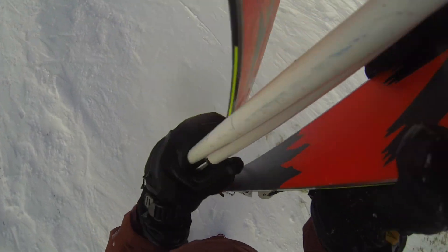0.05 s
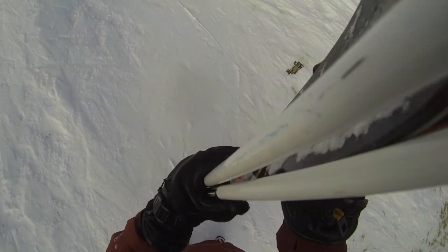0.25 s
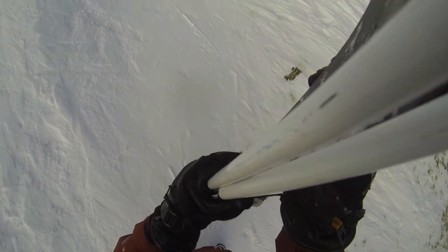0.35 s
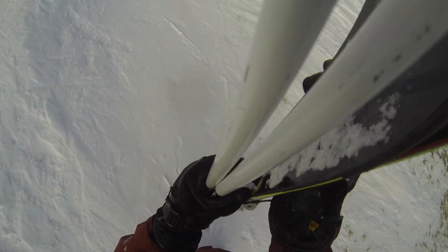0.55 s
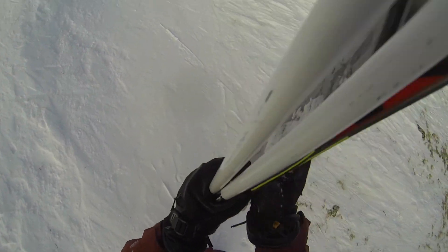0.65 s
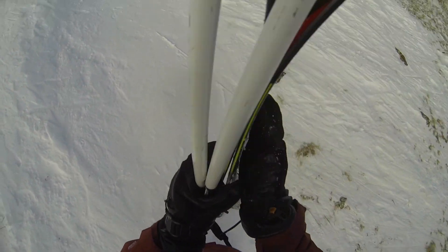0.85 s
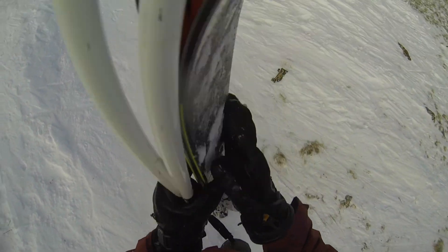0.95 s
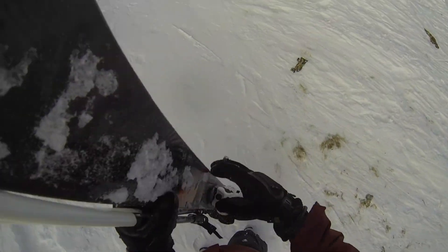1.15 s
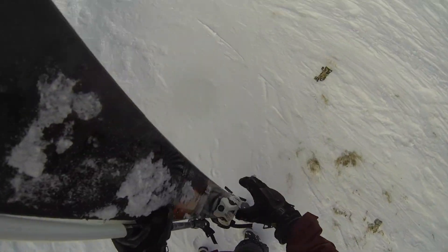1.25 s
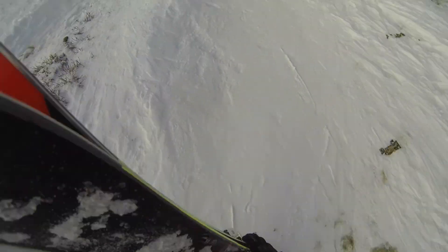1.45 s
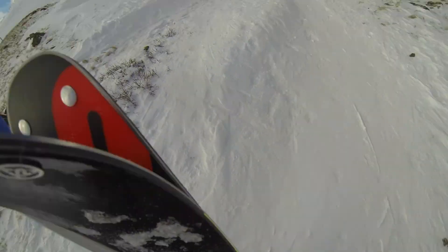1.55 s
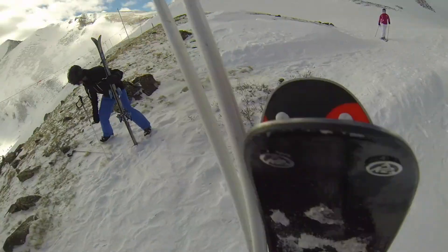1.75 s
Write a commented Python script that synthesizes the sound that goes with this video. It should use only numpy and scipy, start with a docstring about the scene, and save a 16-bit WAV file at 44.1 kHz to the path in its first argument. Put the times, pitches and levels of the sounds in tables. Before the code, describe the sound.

Skis hit right against the microphone with a loud hollow clack and a brief scraping rattle. Poles then tap thinly and gloves rub faintly, while wind rumbles and thumps on the microphone outdoors on a snowy slope.

```python
"""Gathering up skis and poles

On a snowy slope, skis knock against the camera's case, bend and chatter along their edges.
Poles tap, gloves and snow rub, and wind buffets and thumps the microphone.
The first knock overloads the recorder, which turns its volume down and then lets it creep back."""
import sys
import numpy as np
from scipy import signal
from scipy.fft import rfft, irfft
from scipy.io import wavfile
from scipy.ndimage import uniform_filter1d

SR = 44100
rng = np.random.default_rng(int(sys.argv[2]) if len(sys.argv) > 2 else 0)


def unload_wav(signal):
    """Save mono or channel-first audio to the path in sys.argv[1] as 16-bit WAV at rate SR, clipped to [-1, 1]."""
    wavfile.write(
        sys.argv[1],
        SR,
        np.round(np.clip(np.atleast_2d(signal).T, -1, 1) * 32767).astype(np.int16),
    )


N = 79380
TIME = np.arange(N) / SR

# A struck object rings with a few tones, its "modes". Ring time is how long one takes to fade by 60 dB.
# tones of a ski: (pitch [Hz], level [dB], ring time [s])
SKI_MODES = [(253, -24.5, 0.035), (430, -33, 0.013), (473.1, -22, 0.021), (638, -29.5, 0.067),
             (892, -33, 0.044), (1040, -27.5, 0.035), (1445, -30, 0.11), (1615, -36, .11),
             (1930, -26.5, 0.063), (2164, -26, 0.026), (2400, -33.5, 0.048), (2950, -39, .06),
             (3385, -47, 0.11)]
# tones of a pole, heard through the case: (pitch [Hz], level [dB], ring time [s])
POLE_MODES = [(1330, -1, 0.026), (1540, -1.5, 0.022), (2190, -11.5, 0.013), (2658.6, -13.5, .025),
              (3080, -14.5, 0.024), (3500, -13, 0.016), (4100, -18.5, .025), (4820, -11, .03),
              (5070, -15, 0.012), (6040, -14, 0.021), (6700, -20.5, 0.018), (7750, -20.5, .02)]


def ski_knocks():
    """Skis hit the case with a hollow clack, a thud and a crack, then ring and bend."""
    # knocks and bounces: (time [s], level [dB], brightness [Hz], crack [dB], thud [dB], clack pitch [Hz])
    knocks = [(0.2144, 22.5, 4245, -12.5, -7, 1442), (0.2249, 2.5, 2967, -14, -21.5, 1507),
              (0.234, -6, 2800, -24, -16.5, 1500), (0.2401, -0.5, 2400, -11, -20.5, 1550),
              (0.2576, -7, 2500, -5, -20, 1500), (.2602, 10.5, 3500, -19, -25, 1540),
              (0.27, -0.5, 1500, -13.5, -23, 1500), (.3370, 1.5, 2930, -14.5, -11, 1553),
              (0.3405, 2.5, 1720, -27, -17.5, 1454)]
    # heavy shoves that bend the skis: (time [s], level [dB])
    shoves = [(0.2155, -1), (0.235, -10), (0.26, -9), (0.339, -4), (.3750, -11.5), (0.392, -14.5)]
    # low tones of a whole ski bending: (pitch [Hz], level [dB], ring time [s])
    bending_modes = [(50, -4.5, 0.15), (101.5, -3.5, 0.058), (157, -17.5, .11)]
    # brief presses against the case: (time [s], level [dB], clack pitch [Hz])
    nudges = [(0.24, -7.5, 1540), (.3080, -17, 1587), (.3120, -17.5, 1500), (0.3724, -14.5, 1458),
              (0.3766, -5.5, 1468), (0.386, -13, 1420)]
    # the blow itself, gone at once: (pitch [Hz], level [dB], ring time [s])
    thud_modes = [(350, -0.5, .012), (966, 2.5, .012)]
    # tone colour of the crack: (frequency [Hz], level [dB])
    crack_colour = [(150, -1.5), (700, 10.5), (1500, 3.5), (3500, -5.5), (6000, -33), (10000, -28.5),
                    (15000, -24.5)]
    out = ring(sum(click(s, db) for s, db in shoves), bending_modes)
    out += sum(clack(click(s, db), hz) for s, db, hz in nudges)
    for s, db, bright_hz, crack_db, thud_db, pitch_hz in knocks:
        force = soften(click(s, db), bright_hz)
        out += clack(force, pitch_hz) + from_db(thud_db) * ring(force, thud_modes)
        out += strike([(s, db, bright_hz)], case_overtones() + SKI_MODES)
        out += cracks([(s, db + crack_db, bright_hz)], crack_colour, ring_s=0.02)
    return out


def clack(force, hz, ring_s=0.0076):
    """The case's main tone, applied twice so that it swells for a few cycles and dies."""
    decay, angle = np.exp(-np.log(1000) / (ring_s * SR)), 2 * np.pi * hz / SR
    once = ring(force, [(hz, 10.5, ring_s)])
    gain = (1 - decay ** 2) / 2
    return signal.lfilter([gain, 0, -gain], [1, -2 * decay * np.cos(angle), decay ** 2], once)


def case_overtones(ring_s=0.007):
    """List the case's higher tones, which die almost at once."""
    # tones above the clack: (pitch [Hz], level [dB])
    overtones = [(2450, -12), (2880, -6.5), (3400, -12), (4400, -16), (5000, -25.5), (6000, -31),
                 (7200, -30.5)]
    return [(hz, db, ring_s) for hz, db in overtones]


def edge_chatter():
    """Sliding edges make many tiny slips that keep the case and skis ringing between knocks."""
    # strength of the chatter: (time [s], level [dB])
    chatter = [(.214, -61), (.219, -27), (.244, -38.5), (.252, -50), (.268, -5.5), (.288, -31), (.303, -25),
               (.313, -25.5), (.320, -38.5), (.335, -37), (.341, -12.5), (.360, -25), (.378, -21.5),
               (.394, -23.5), (.406, -58.5), (.46, -81)]
    # tone colour of the gritty scrape: (frequency [Hz], level [dB])
    grit_colour = [(120, 2), (650, 6), (900, -3.5), (1500, 13.5), (2800, -1), (4300, -22), (6000, -34),
                   (12000, -50.5)]
    slips = grains(per_s=1700, spread_db=2)
    force = soften(slips, hz=1380)
    case = rms_one(clack(force, hz=1500) + ring(force, case_overtones()))
    skis = from_db(-11) * rms_one(ring(slips, SKI_MODES))
    grit = from_db(-11.5) * coloured(slips, grit_colour)
    return level(chatter) * (case + skis + grit)


def pole_taps(bass_cut_hz=1310):
    """Poles tap with no weight behind them, so they sound thin and bright."""
    # light taps: (time [s], level [dB], brightness [Hz])
    taps = [(.527, -44.5, 6000), (.656, -42, 6000), (.668, -19, 13940), (.710, -27, 5500),
            (.724, -39, 7280), (.748, -40, 5500), (.775, -40, 4000), (.821, -32.5, 2320),
            (1.0205, -31, 1833), (1.603, -38.5, 1500)]
    # tone colour of a tap's crack: (frequency [Hz], level [dB])
    crack_colour = [(200, -28.5), (900, -17), (1500, -4.5), (5000, -5), (8000, -26.5), (14000, -28.5)]
    bass_cut = signal.butter(4, bass_cut_hz, "high", fs=SR, output="sos")
    ringing = signal.sosfilt(bass_cut, strike(taps, POLE_MODES))
    return ringing + from_db(-12.5) * cracks(taps, crack_colour, ring_s=0.033)


def rubbing():
    """Gloves and snow slide over the gear in fine grains, making the poles ring faintly."""
    # strength of the rubbing: (time [s], level [dB])
    rub = [(0, -69.5), (.07, -66), (.095, -59), (.13, -67), (.18, -63.5), (.22, -75), (.69, -70.5),
           (.715, -53), (.75, -54), (.80, -68), (.95, -82), (1.07, -66), (1.12, -69.5), (1.17, -61.5),
           (1.22, -79.5), (1.57, -83.5), (1.68, -64.5), (1.735, -52.5), (1.765, -53), (1.8, -80)]
    # its tone colour: (frequency [Hz], level [dB])
    rub_colour = [(800, -20), (1500, 6.5), (2200, -3), (2700, -2.5), (3150, 4), (3600, -3.5), (4050, -0.5),
                  (4600, -6.5), (5200, -4), (7000, -17), (14000, -28.5)]
    grit = grains(per_s=1100, spread_db=3.5)
    ringing = np.diff(ring(grit, POLE_MODES), prepend=0)  # favours the high tones
    poles = from_db(-8) * rms_one(soften(ringing, hz=6000))
    return level(rub) * rms_one(coloured(grit, rub_colour) + poles)


def wind_thumps():
    """Sudden puffs of wind hit the microphone and give a low thump."""
    # puffs of wind: (time [s], level [dB])
    puffs = [(0.791, -38.5), (1.157, -38.5), (1.485, -27), (1.645, -30.5)]
    # tones of the thump: (pitch [Hz], level [dB], ring time [s])
    thump_modes = [(64.9, -6, 0.22), (115.3, 2, 0.088), (163, 0, 0.075), (304, -32, 0.07),
                   (630, -19, 0.012)]
    return ring(sum(click(s, db) for s, db in puffs), thump_modes)


def wind():
    """Wind rumbles and buffets on the microphone and rushes round the case."""
    # strength of the deep gusts, low buffeting and airy rush: (time [s], level [dB])
    gusts = [(0, -38.5), (.2, -39), (.42, -30.5), (.55, -45.5), (.67, -39.5), (.76, -35.5), (.83, -36.5),
             (.92, -40), (1.05, -38.5), (1.2, -36.5), (1.28, -28.5), (1.39, -37.5), (1.49, -33.5),
             (1.57, -36.5), (1.8, -37)]
    buffet = [(0, -61), (.6, -63), (1.0, -61.5), (1.25, -57.5), (1.45, -56), (1.5, -47), (1.56, -57),
              (1.66, -46), (1.8, -49.5)]
    rush = [(0, -62), (.2, -58), (.5, -58.5), (.8, -55.5), (.95, -57.5), (1.12, -58.5), (1.3, -54),
            (1.55, -56), (1.64, -52.5), (1.8, -51.5)]
    # tone colour of each: (frequency [Hz], level [dB])
    gust_colour = [(15, -1.5), (30, -6.5), (48, 5.5), (70, -12.5), (130, -11.5), (200, -27.5), (400, -48.5),
                   (1000, -76)]
    buffet_colour = [(50, -17), (100, 12.5), (170, 2.5), (310, 8), (500, -11.5), (1000, -45.5)]
    rush_colour = [(100, -3), (300, -4.5), (500, -8), (800, -14.5), (1100, -7.5), (1350, 1.5), (1560, 5.5),
                   (1900, -11), (2800, -16.5), (4000, -22.5), (8000, -38), (15000, -48)]
    on_microphone = level(gusts) * noise(gust_colour) + level(buffet) * noise(buffet_colour)
    return on_microphone + level(rush) * noise(rush_colour)


def faint_hiss():
    """A steady hiss lies under everything."""
    # tone colour of the hiss: (frequency [Hz], level [dB])
    hiss_colour = [(500, 3.5), (5000, -0.5), (9500, 0), (12000, -8), (15000, -14.5)]
    return from_db(-78) * noise(hiss_colour)


def from_db(db):
    """Turn decibels into a multiplier."""
    return 10 ** (np.asarray(db) / 20)


def rms_one(x):
    """Scale a sound so its average strength (rms) is 1."""
    return x / np.sqrt(np.mean(x ** 2) + 1e-20)


def level(points):
    """Join (time [s], level [dB]) points into a volume curve."""
    return from_db(np.interp(TIME, *np.transpose(points)))


def coloured(x, colour):
    """Give a sound a tone colour, at strength 1."""
    hz, db = np.transpose(colour)
    bin_hz = np.maximum(np.arange(N // 2 + 1) * SR / N, 1)
    gains = from_db(np.interp(np.log(bin_hz), np.log(hz), db))
    return rms_one(irfft(rfft(x) * gains, N))


def noise(colour):
    """Steady noise with a tone colour."""
    return coloured(rng.standard_normal(N), colour)


def grains(per_s, spread_db):
    """Random clicks of uneven size and sign."""
    happens = rng.random(N) < per_s / SR
    sizes = from_db(spread_db * np.minimum(rng.exponential(1, N), 4))
    return happens * sizes * rng.choice([-1, 1], N)


def soften(x, hz):
    """A soft contact dulls the sound above hz."""
    decay = np.exp(-2 * np.pi * hz / SR)
    return signal.lfilter([(1 - decay) ** 2], [1, -2 * decay, decay ** 2], x + 1e-18)


def click(s, db):
    """One sharp push at s seconds."""
    return from_db(db) * (np.arange(N) == int(s * SR))


def ring(force, modes):
    """A push sets off fading tones; every other one is flipped in sign."""
    out = 0
    for k, (hz, db, ring_s) in enumerate(modes):
        decay, angle = np.exp(-np.log(1000) / (ring_s * SR)), 2 * np.pi * hz / SR
        feedback = [1, -2 * decay * np.cos(angle), decay ** 2]
        tone = signal.lfilter([0, np.sin(angle)], feedback, force + 1e-18)
        out += (-1) ** k * from_db(db) * tone
    return out


def strike(hits, modes, scatter_db=4.5):
    """Each hit rings the same tones in a slightly different balance."""
    out = 0
    for s, db, bright_hz in hits:
        varied = [(hz, tone_db + scatter_db * rng.standard_normal(), t) for hz, tone_db, t in modes]
        out += ring(soften(click(s, db), bright_hz), varied)
    return out


def cracks(hits, colour, ring_s):
    """Each hit gives a burst of quickly dying noise."""
    hiss = noise(colour)
    out = 0
    for s, db, bright_hz in hits:
        fade = (TIME >= s) * np.exp(-np.log(1000) * np.abs(TIME - s) / ring_s)
        out += soften(from_db(db) * fade * hiss, 2 * bright_hz)
    return out


def scene():
    """Add all the sources into one channel."""
    gear = ski_knocks() + edge_chatter() + pole_taps() + rubbing()
    return (gear + wind_thumps() + wind() + faint_hiss())[None]


def record(dry):
    """Loud peaks turn the volume down and it slowly returns; what is still too loud is squashed."""
    threshold_db, max_dip_db, recover_db_per_s = -17.5, 15, 17.5
    look_ahead_s, treble_cut_hz = 0.0086, 16000
    over_db = np.clip(20 * np.log10(np.abs(dry[0]) + 1e-9) - threshold_db, 0, max_dip_db)
    recovery_db = recover_db_per_s * TIME
    dip_db = np.maximum.accumulate(over_db + recovery_db) - recovery_db
    early_dip_db = np.interp(TIME + look_ahead_s, TIME, dip_db)
    lowered = dry * from_db(-uniform_filter1d(early_dip_db, size=200))
    squashed = lowered / (1 + lowered ** 8) ** (1 / 8)
    return signal.sosfilt(signal.cheby2(12, 75, treble_cut_hz, fs=SR, output="sos"), squashed)


dry = scene()
out = record(dry)
unload_wav(out)
```